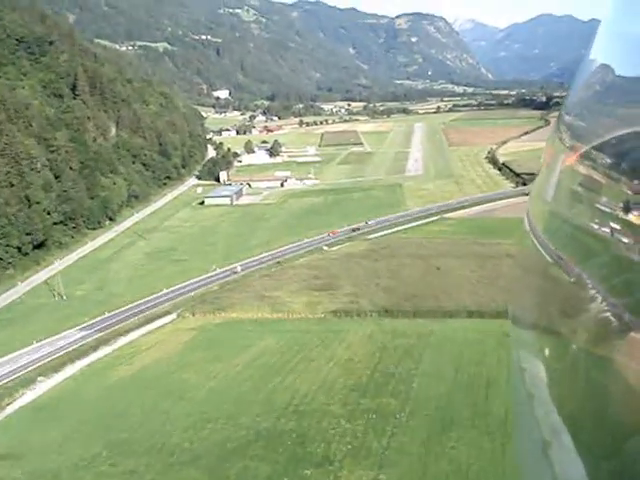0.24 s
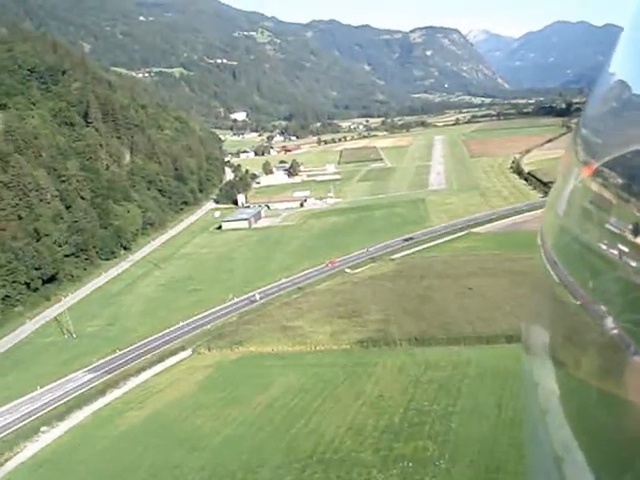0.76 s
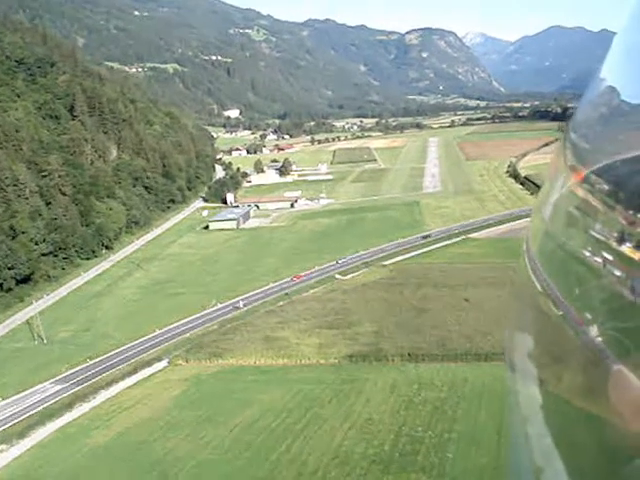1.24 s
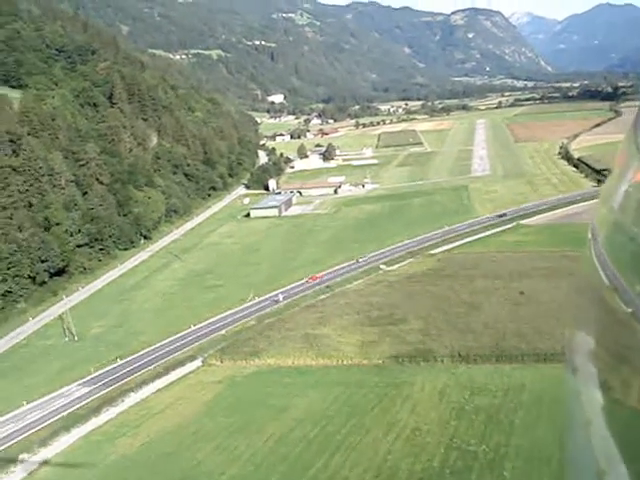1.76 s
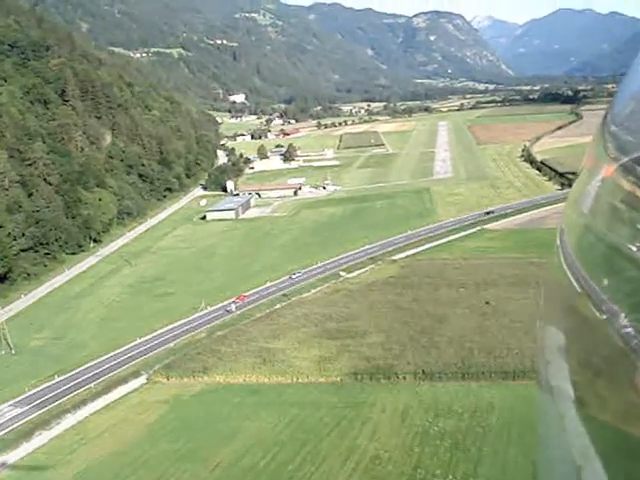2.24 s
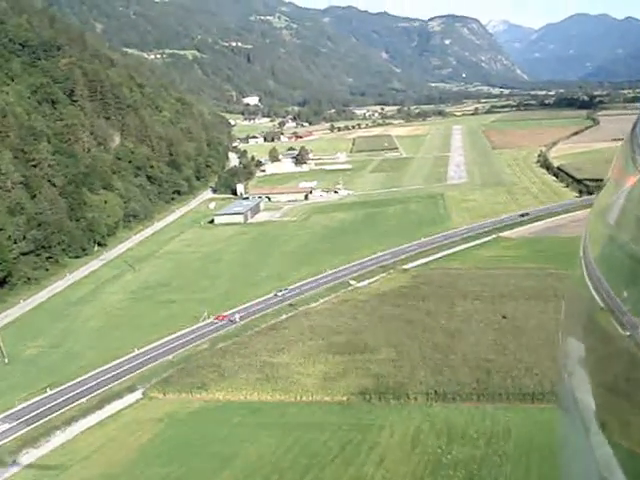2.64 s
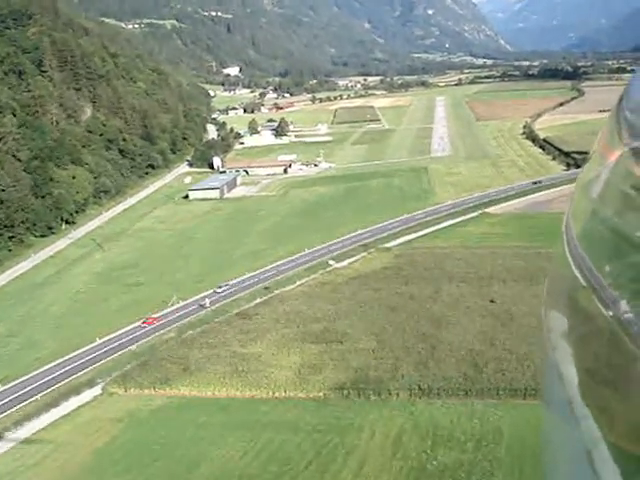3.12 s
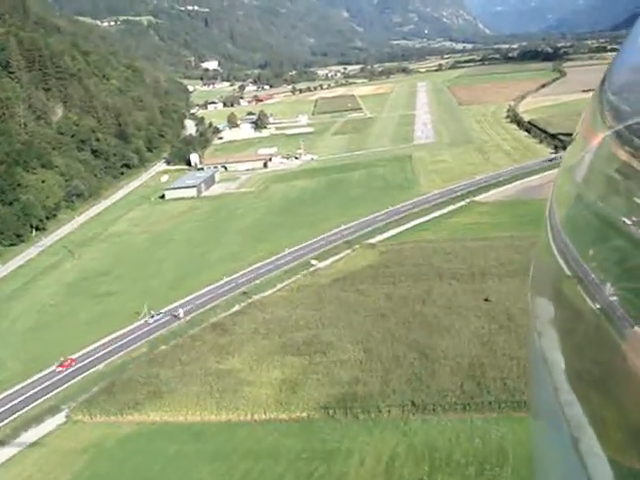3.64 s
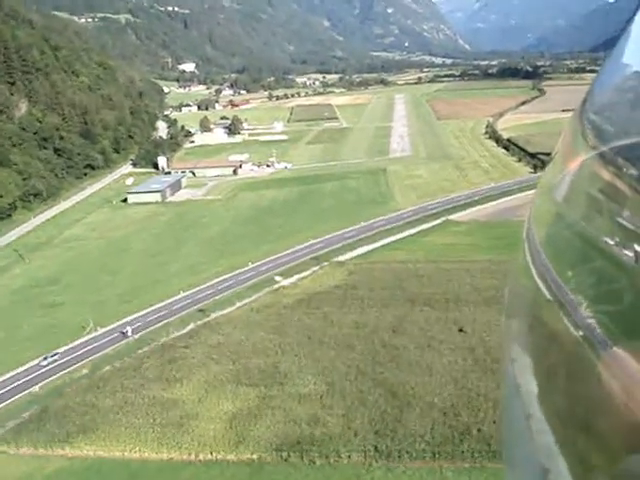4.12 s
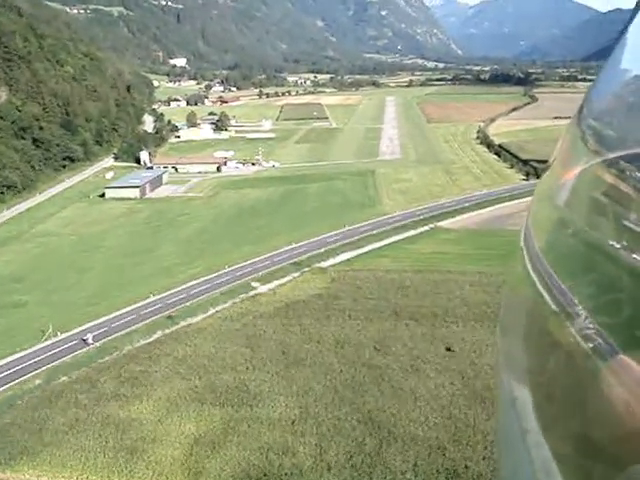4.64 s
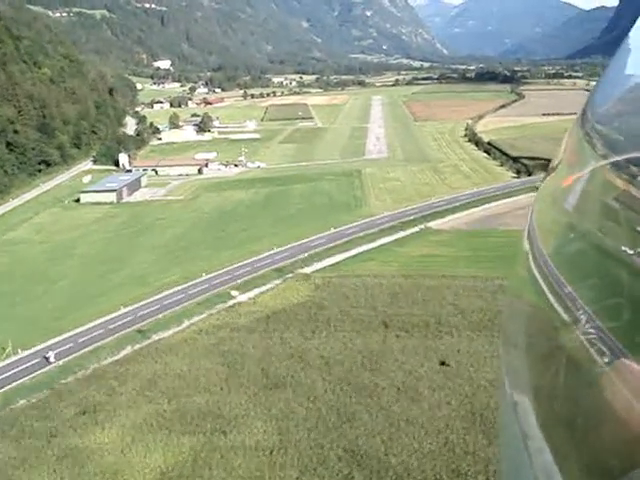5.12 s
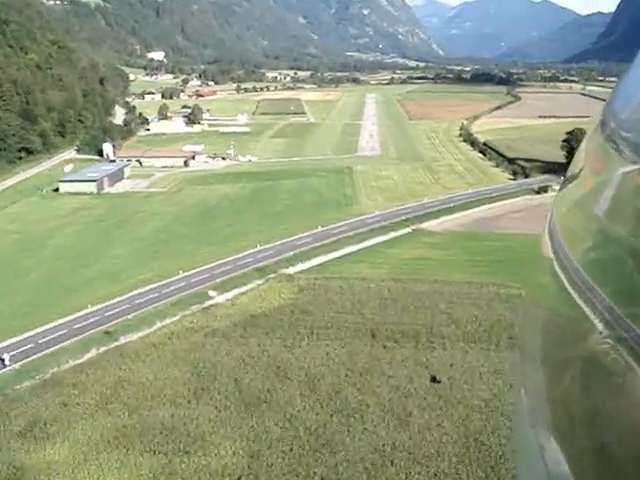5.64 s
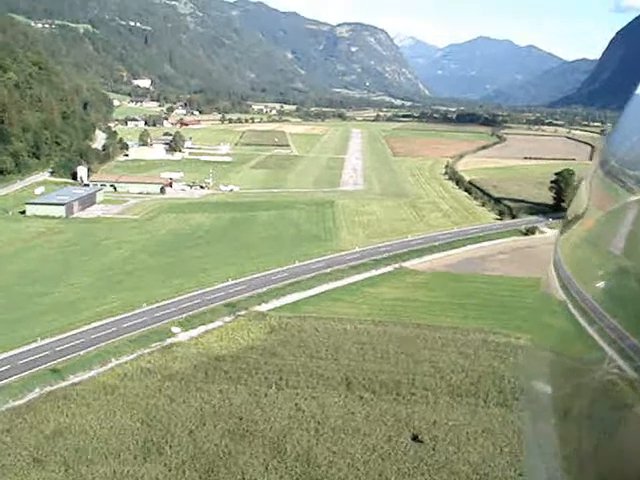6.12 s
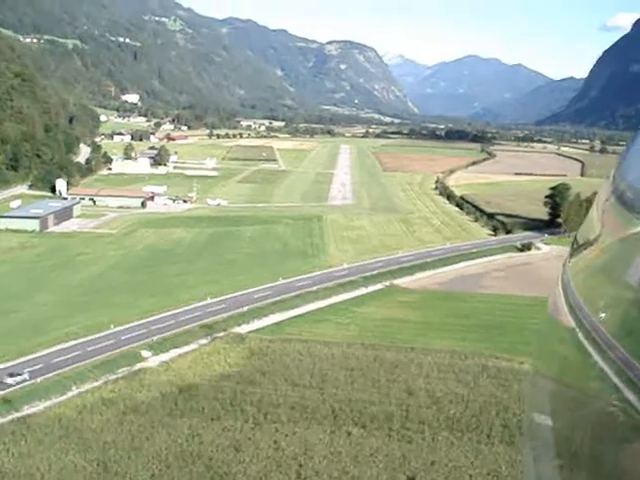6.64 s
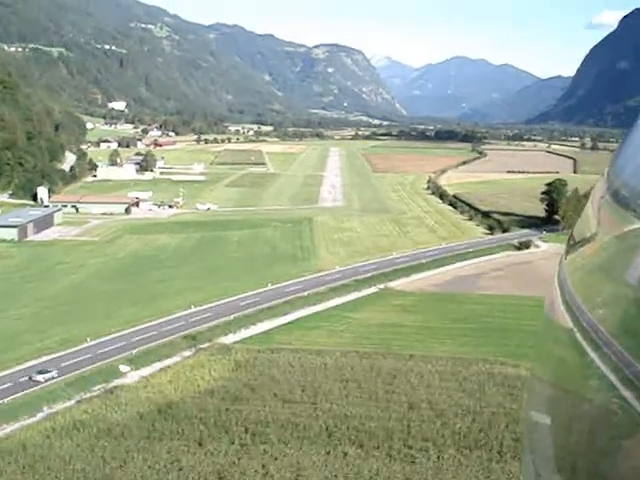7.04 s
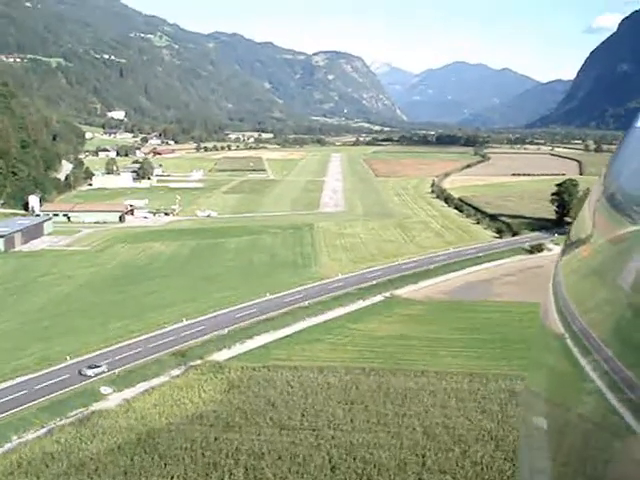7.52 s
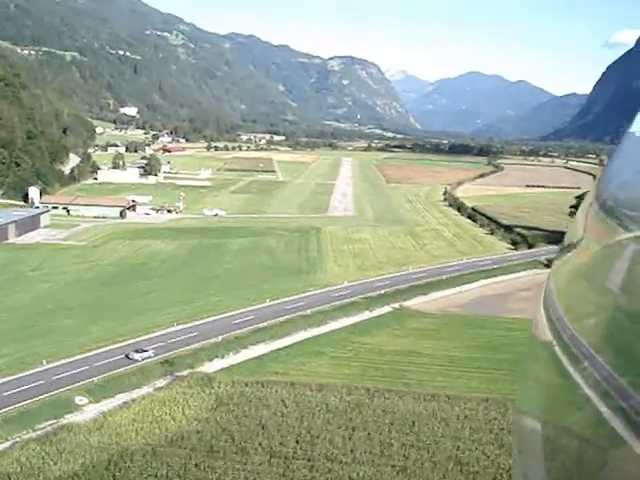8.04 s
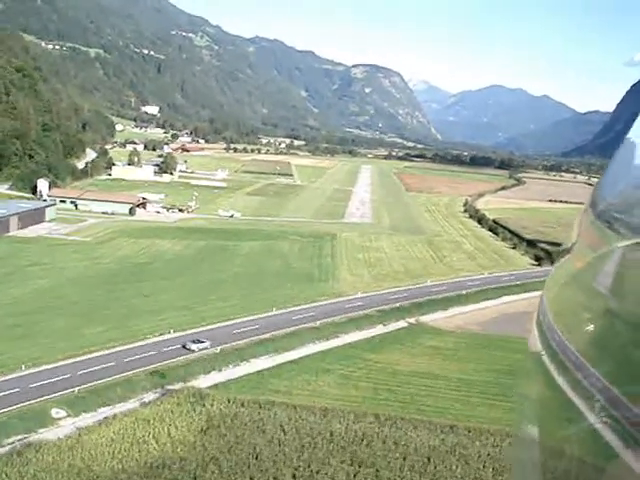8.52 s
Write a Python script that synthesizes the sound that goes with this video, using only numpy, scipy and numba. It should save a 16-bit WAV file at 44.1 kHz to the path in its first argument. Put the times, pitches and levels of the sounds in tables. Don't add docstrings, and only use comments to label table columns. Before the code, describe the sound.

A glider descends toward a grassy valley airfield, and a small microphone on its canopy hears only air. From 0 s the wind is loud, continuous and badly overloaded: a harsh, crackling, tearing rush, thin in deep bass, with gritty, metallic digital treble. It is bright and hissy at first, fluttering quickly, and rises slightly in pitch to a peak around 1.6 s. It then sinks, dropping abruptly near 2.6 s into a rougher, lower roar. Around 3.4 s a fresh wash of hiss spreads over it, easing by 3.7 s. From about 4.8 s the roar deepens again, wavering near 6 s and reaching its lowest, coarsest rumbling flutter around 7.1 s. It lifts a little by 7.9 s and holds to the end near 9 s. The sound is almost mono, with tiny scattered flecks of wide treble, mostly in the first five seconds.

```python
import sys
import numpy as np
from scipy import signal
from scipy.fft import rfft, irfft, next_fast_len
from scipy.io import wavfile
from scipy.ndimage import uniform_filter1d
from numba import njit

SR = 44100
rng = np.random.default_rng(int(sys.argv[2]) if len(sys.argv) > 2 else 0)


def bounce(signal):
    frames = np.transpose(np.atleast_2d(signal))
    limited = np.clip(frames, -1, 1)
    pcm = np.round(limited * 32767).astype(np.int16)
    wavfile.write(sys.argv[1], SR, pcm)


def magnitude_from_level(level_db):
    exponent = np.asarray(level_db, float) / 20
    return 10 ** exponent


N = 387198

# time in seconds, eddy pitch in Hz, hiss level in dB re eddies.
AIRFLOW = [(0.0, 1050, -3.5), (0.6, 1120, -6.5), (0.9, 1000, -5.2), (1.25, 1140, -8.5), (1.63, 1270, -5),
           (1.75, 1060, -11), (2.0, 920, -9.5), (2.52, 1000, -10.5), (2.6, 704, -10), (3.0, 820, -12),
           (3.4, 890, -3.5), (3.65, 770, -6.5), (4.8, 730, -7.5), (5.4, 610, -10.2), (5.95, 727, -10.5),
           (7.1, 575, -13.5), (7.85, 683, -11.5), (8.78, 685, -12.5)]
# burst centre in seconds, band centre in Hz.
STEREO_BURSTS = [(0.373, 9600), (0.381, 5000), (0.441, 8200), (0.442, 6300), (1.066, 6000), (1.234, 5250),
                 (1.301, 6700), (1.438, 7000), (1.439, 11600), (1.629, 6250), (1.677, 10300), (1.695, 6950),
                 (1.696, 4850), (2.067, 12100), (2.069, 15100), (2.461, 14100), (2.483, 5500),
                 (2.879, 7550), (3.228, 8950), (3.366, 4950), (3.367, 8300), (4.226, 6250), (4.641, 13100),
                 (4.643, 6050), (4.644, 8950), (4.711, 7000), (4.832, 7600), (8.126, 13150), (8.659, 6900),
                 (8.66, 4850)]

HISS_HZ, HISS_FLICKER_DB = 3760, 1.2
BUFFET_HZ, BUFFET_DB = 39, -14
EDDY_WIDTH, EDDY_TOP = 1.22, 3.29
EDDY_WANDER_OCTAVES = 0.075
OVERLOAD_DB, RAIL_KNEE, RAIL_OFFSET = 8.8, 6, -0.17
SMOOTH_HZ, RAIL_DB = 2900, -6
WIND_CUT_HZ, RUMBLE_CUT_HZ = 1210, 16
GRIT_DB, HOLD_NOISE_DB = -35, -39
CLOCK_HZ, GUARD_HZ = 24200, 11010
MIRROR_DB, MIRROR_SLOPE, FOLD_DB = 2.5, 1.2, -7
BURST_WIDTH_HZ, BURST_DB = 1350, -1.5


def unit(x):
    return x / np.sqrt(np.mean(x ** 2))


def one_pole(x, hz, kind):
    b, a = signal.butter(1, hz, kind, fs=SR)
    return signal.lfilter(b, a, x)


def gust_walk(rate_hz):
    hold = int(SR / rate_hz)
    steps = np.repeat(rng.standard_normal(N // hold + 1), hold)
    slewed = uniform_filter1d(uniform_filter1d(steps, hold), hold)
    return unit(slewed[:N])


@njit
def moving_filter(x, hz, width):
    band, low = np.empty(len(x)), np.empty(len(x))
    band_state, low_state = 0., 0.
    for i in range(len(x)):
        g = np.tan(np.pi * hz[i] / SR)
        v = (band_state + g * (x[i] - low_state)) / (1 + g * (g + width))
        band[i] = v
        low[i] = low_state + g * v
        band_state = 2 * v - band_state
        low_state += 2 * g * v
    return band, low


def hiss(level_db):
    noise = unit(one_pole(rng.standard_normal(N), HISS_HZ, "low"))
    return noise * magnitude_from_level(level_db + HISS_FLICKER_DB * gust_walk(20))


def buffeting():
    noise = one_pole(rng.standard_normal(N), BUFFET_HZ, "low")
    return unit(one_pole(noise, BUFFET_HZ, "low")) * magnitude_from_level(BUFFET_DB)


def shed_eddies(pitch_hz):
    hz = pitch_hz * 2 ** (EDDY_WANDER_OCTAVES * gust_walk(15))
    shed, _ = moving_filter(rng.standard_normal(N), hz, EDDY_WIDTH)
    _, eddies = moving_filter(shed, EDDY_TOP * hz, np.sqrt(2))
    return unit(eddies * np.sqrt(hz.mean() / hz))


def scene():
    time_s = np.arange(N) / SR
    row_s, row_hz, row_db = np.transpose(AIRFLOW)
    eddy_hz = np.interp(time_s, row_s, row_hz)
    hiss_db = np.interp(time_s, row_s, row_db)
    pressure = unit(hiss(hiss_db) + buffeting() + shed_eddies(eddy_hz))
    return np.tile(pressure, (2, 1))


def overload(x):
    x = x * magnitude_from_level(OVERLOAD_DB) + RAIL_OFFSET
    return x / (1 + np.abs(x) ** RAIL_KNEE) ** (1 / RAIL_KNEE)


def wind_cut(x):
    return one_pole(one_pole(x, WIND_CUT_HZ, "high"), RUMBLE_CUT_HZ, "high")


def converter(x):
    x = x + magnitude_from_level(GRIT_DB) * rng.standard_normal(N)
    guard = signal.cheby1(6, 0.5, GUARD_HZ, fs=SR, output="sos")
    x = signal.sosfilt(guard, x)
    size = next_fast_len(N)
    bins = rfft(x, size)
    clock = int(CLOCK_HZ * size / SR)
    out = bins.copy()
    image = np.arange(clock // 2, len(bins))
    mirror_gain = magnitude_from_level(MIRROR_DB) * ((clock - image) / image) ** MIRROR_SLOPE
    out[image] += np.conj(bins[clock - image]) * mirror_gain
    source = np.arange(size - clock)
    fold_gain = magnitude_from_level(FOLD_DB) * source / (clock + source)
    out[size - clock - source] += np.conj(bins[source]) * fold_gain
    return irfft(out, size)[:N] + magnitude_from_level(HOLD_NOISE_DB) * rng.standard_normal(N)


def stereo_bursts(x, size=1400):
    side = np.zeros(N)
    bin_hz = np.fft.rfftfreq(size, 1 / SR)
    window = np.hanning(size)
    for centre_s, centre_hz in STEREO_BURSTS:
        start = int(centre_s * SR) - size // 2
        span = slice(start, start + size)
        inside = np.abs(bin_hz - centre_hz) < BURST_WIDTH_HZ / 2
        heard = irfft(rfft(x[span] * window) * inside)
        noise = unit(irfft(rfft(rng.standard_normal(size)) * inside))
        level = heard.std() / window.mean() * magnitude_from_level(BURST_DB)
        side[span] += noise * level * window
    return side


def low_pass(x):
    return signal.sosfilt(signal.butter(12, 15740, fs=SR, output="sos"), x)


def record(dry):
    rails = one_pole(overload(dry[0]), SMOOTH_HZ, "low") * magnitude_from_level(RAIL_DB)
    mono = converter(wind_cut(rails))
    side = stereo_bursts(mono)
    mix = np.array([mono + side, mono - side])
    return low_pass(mix)


dry = scene()
out = record(dry)
bounce(out)
```